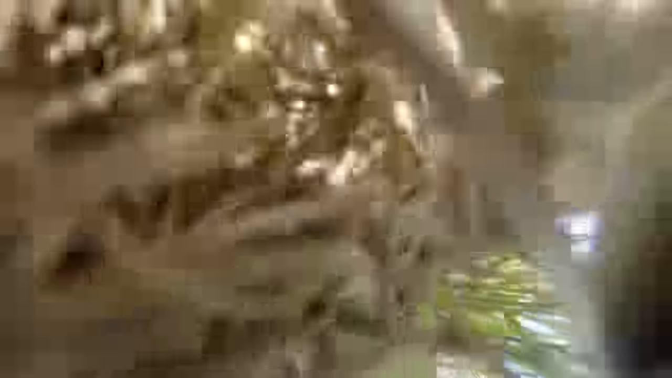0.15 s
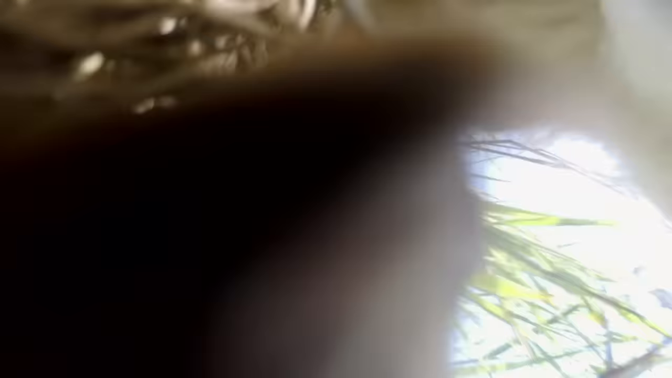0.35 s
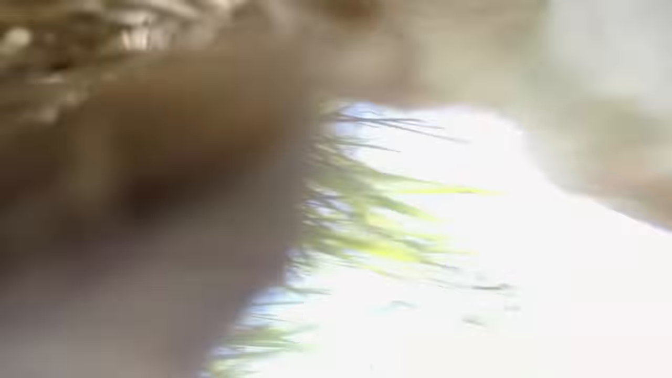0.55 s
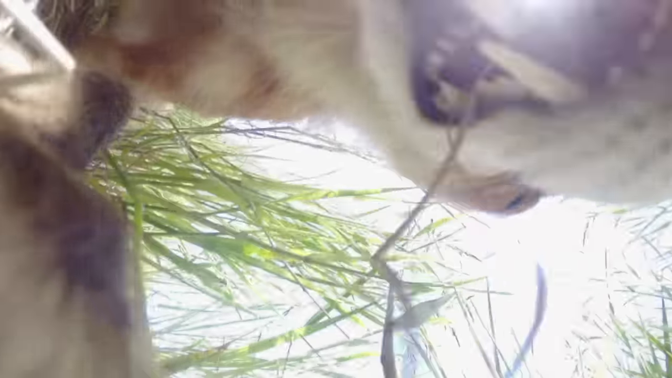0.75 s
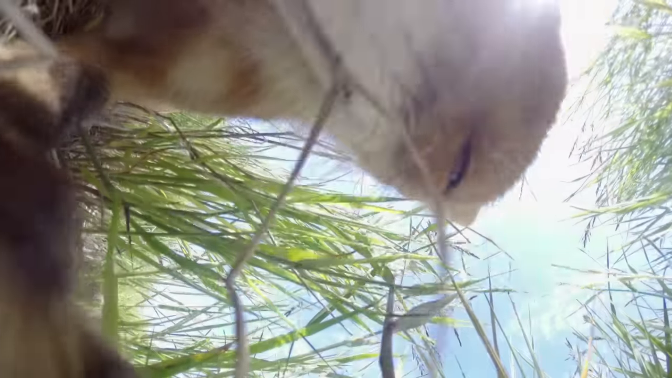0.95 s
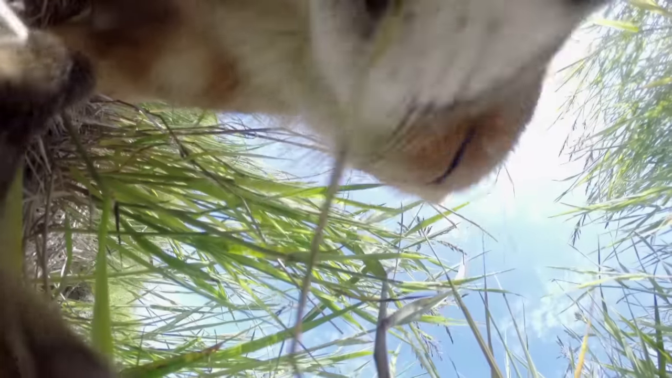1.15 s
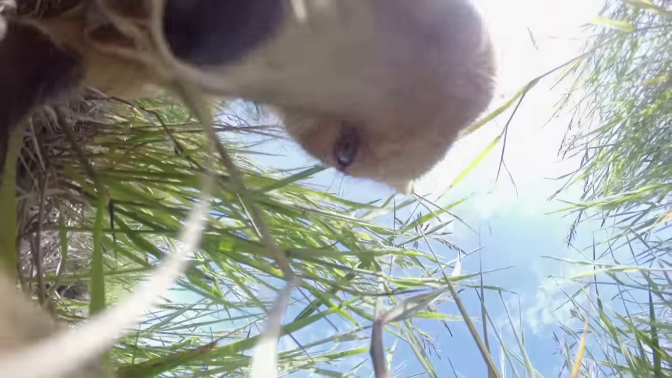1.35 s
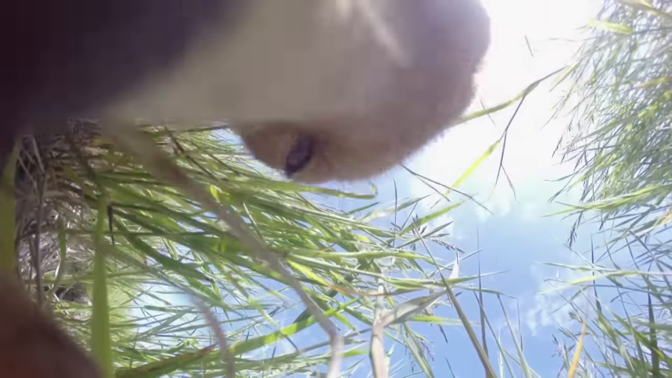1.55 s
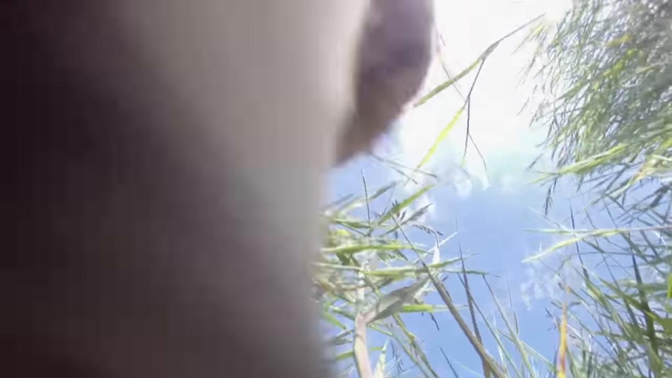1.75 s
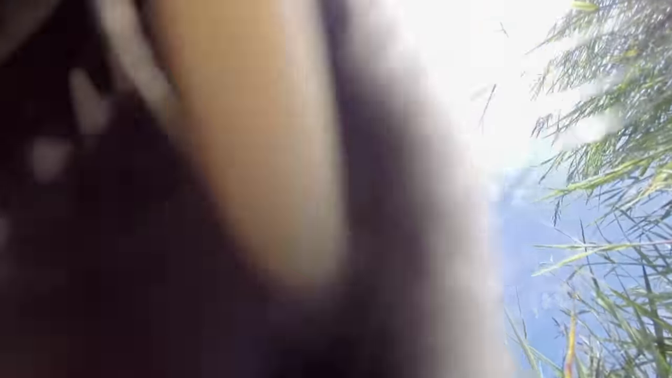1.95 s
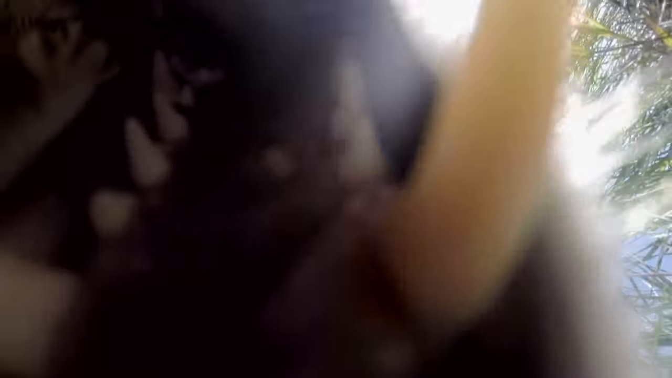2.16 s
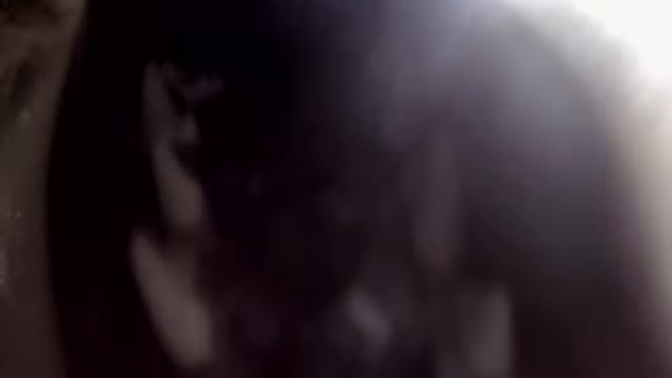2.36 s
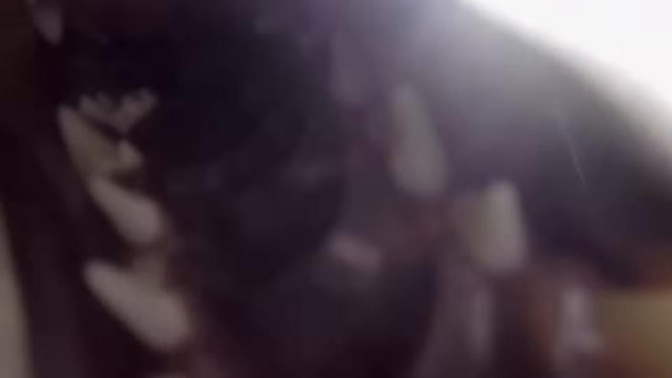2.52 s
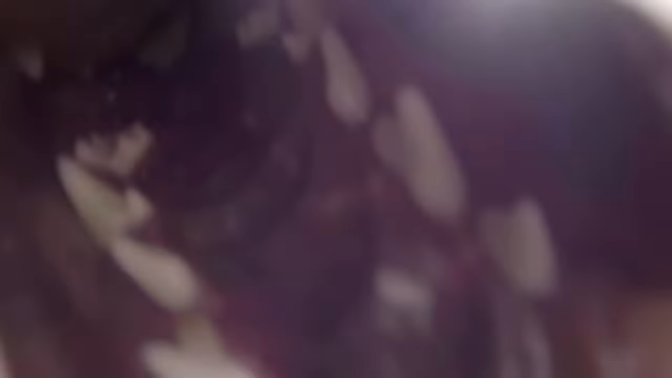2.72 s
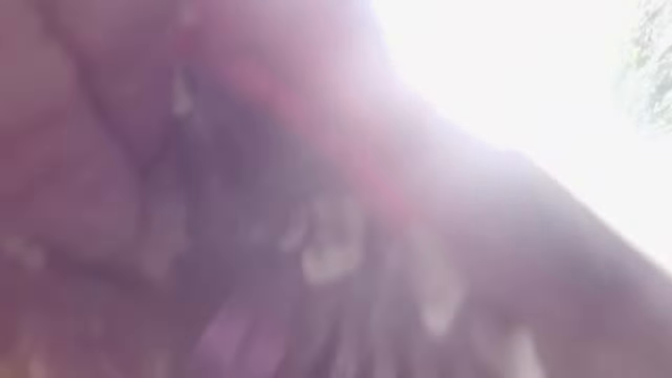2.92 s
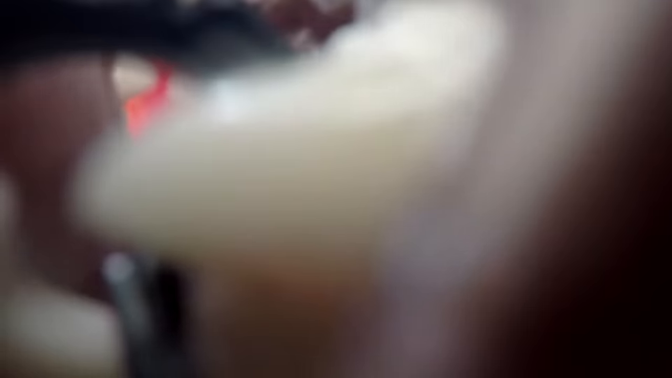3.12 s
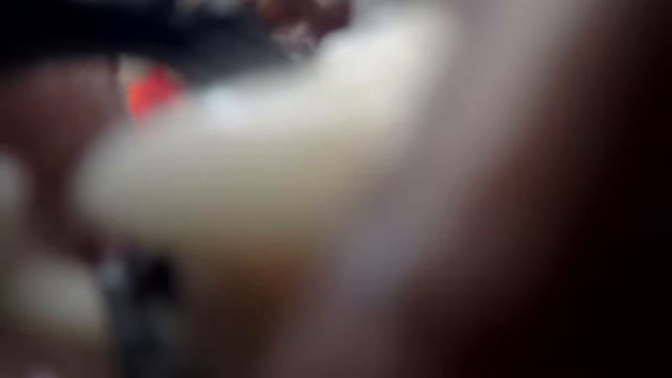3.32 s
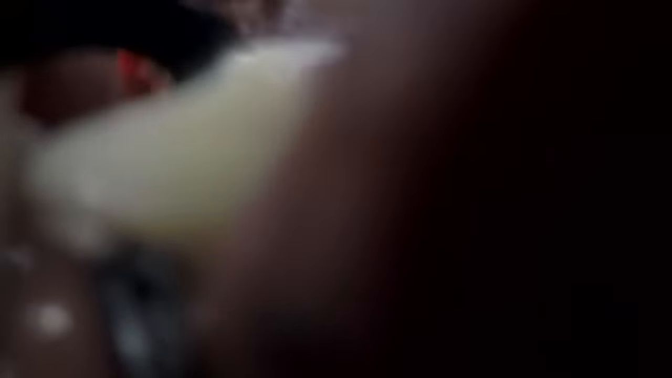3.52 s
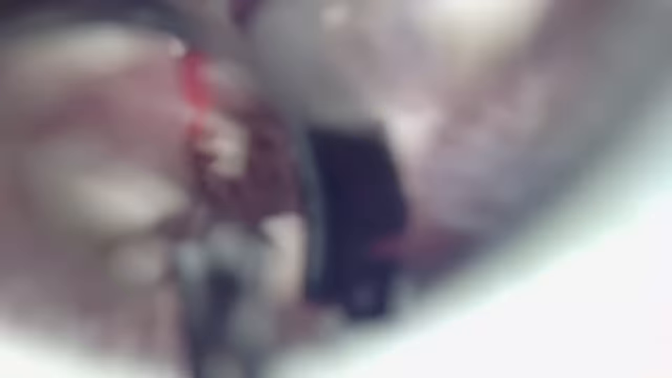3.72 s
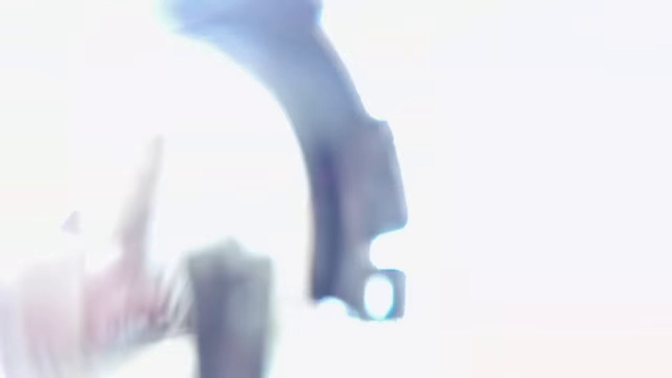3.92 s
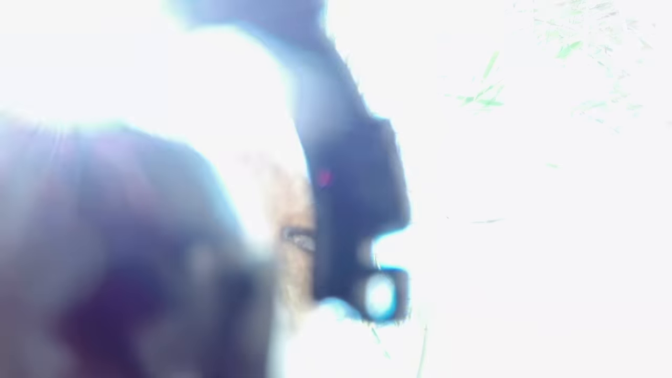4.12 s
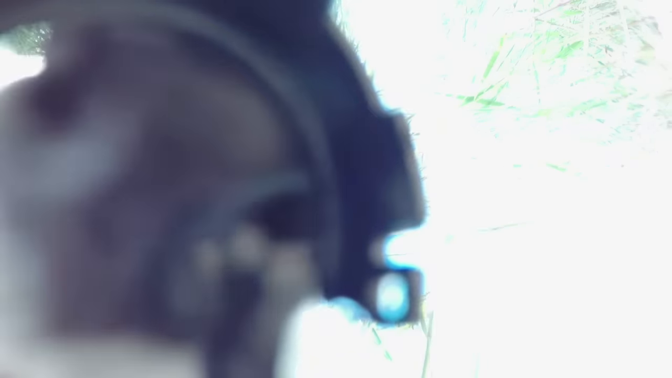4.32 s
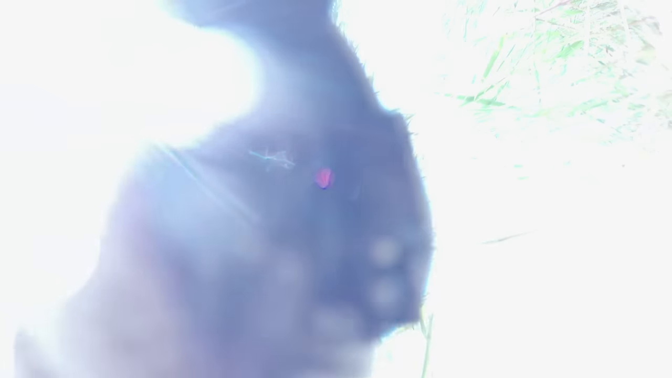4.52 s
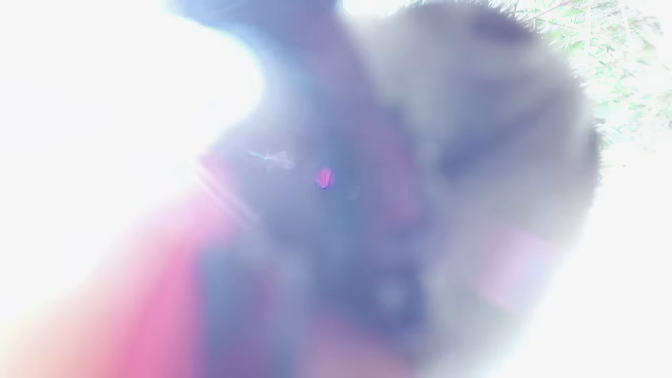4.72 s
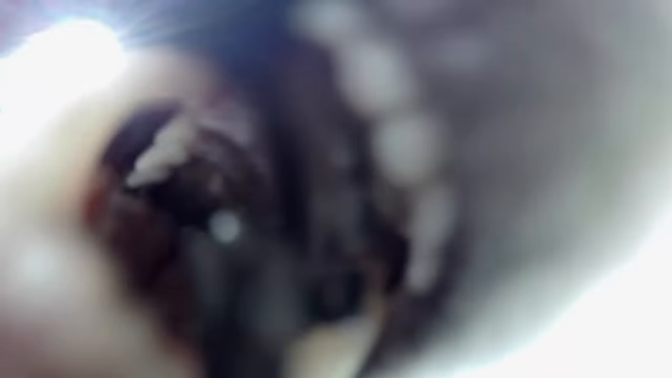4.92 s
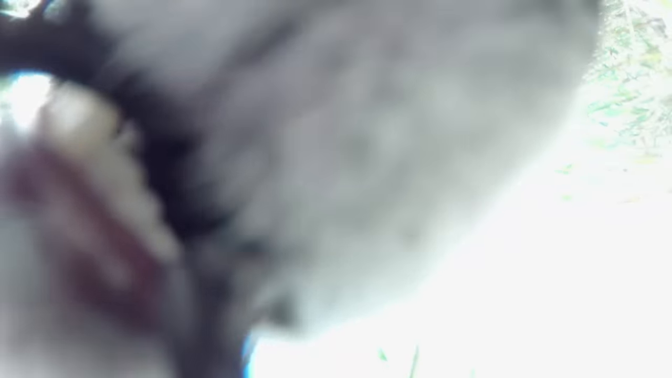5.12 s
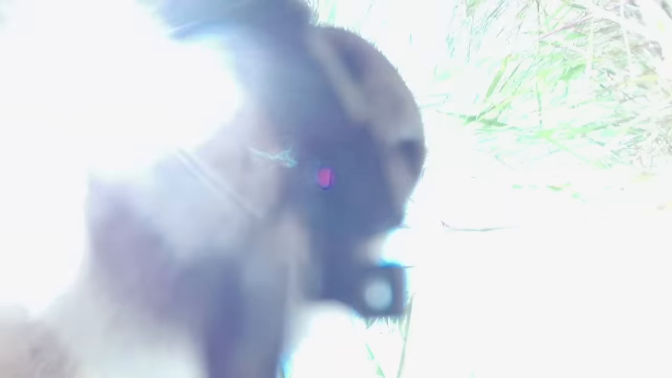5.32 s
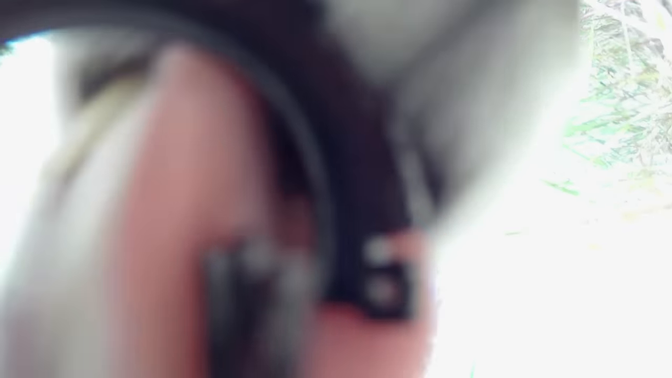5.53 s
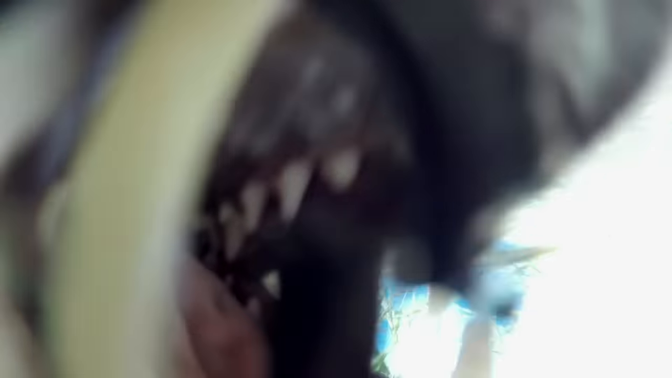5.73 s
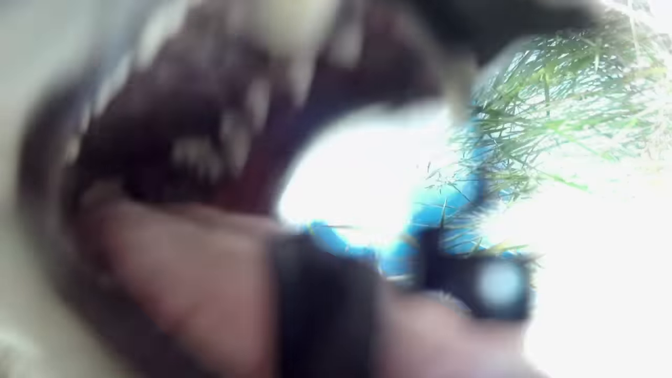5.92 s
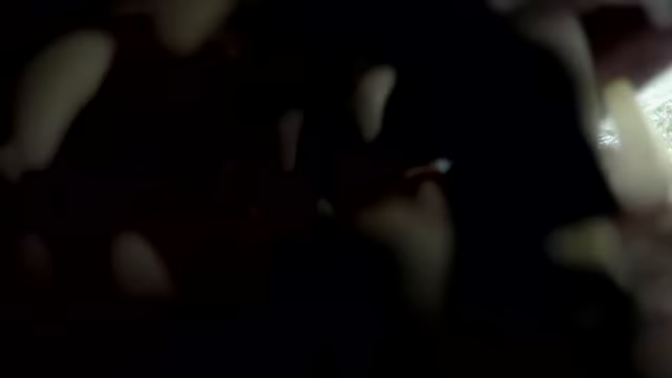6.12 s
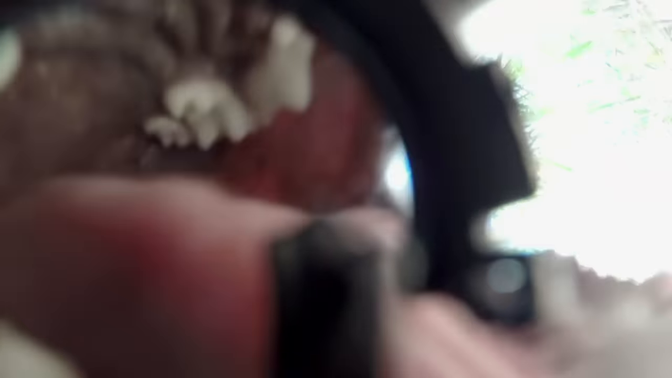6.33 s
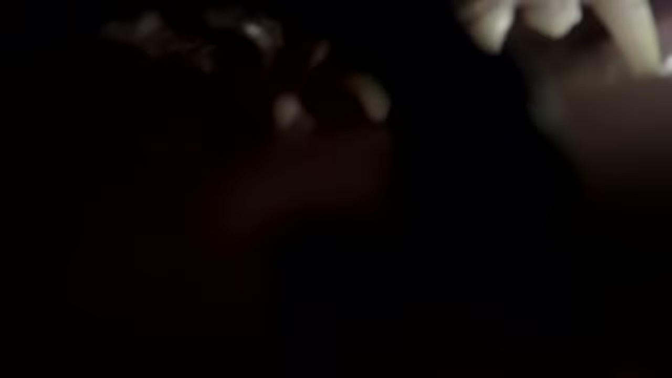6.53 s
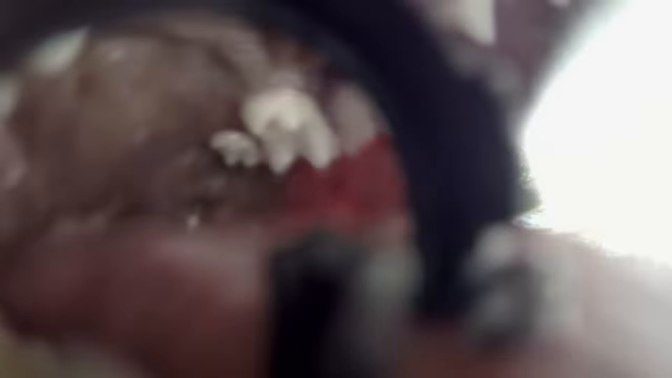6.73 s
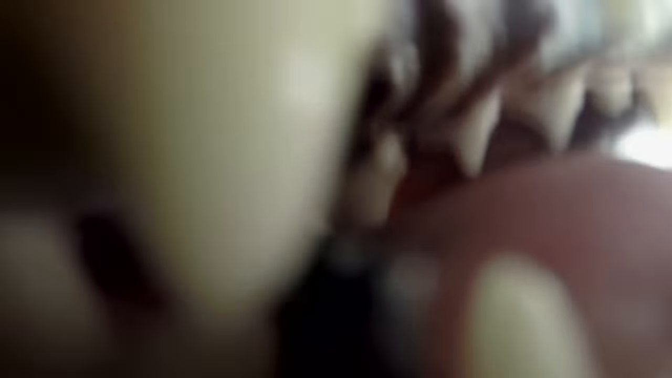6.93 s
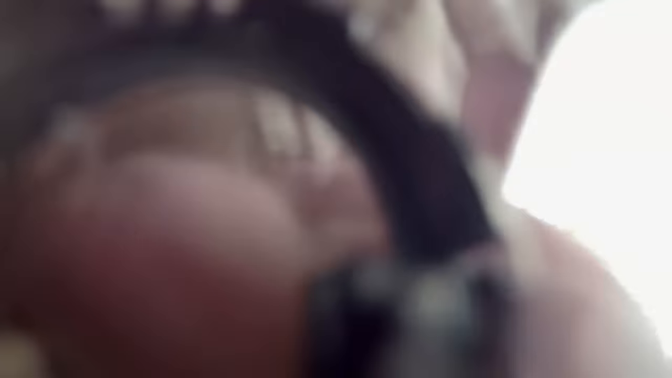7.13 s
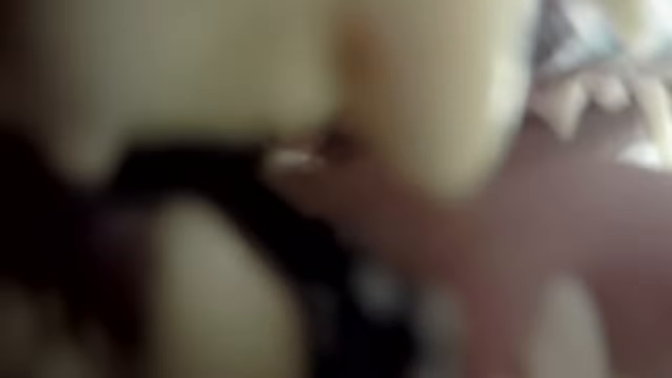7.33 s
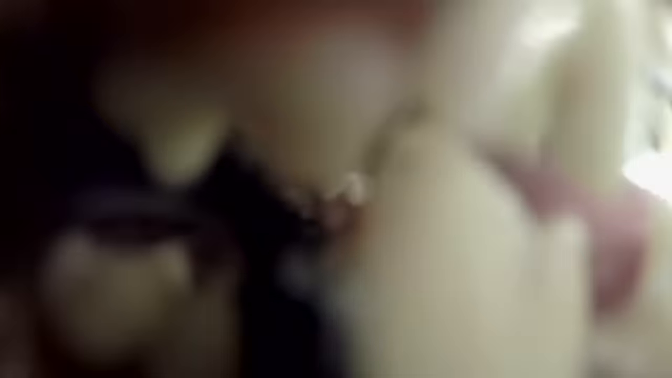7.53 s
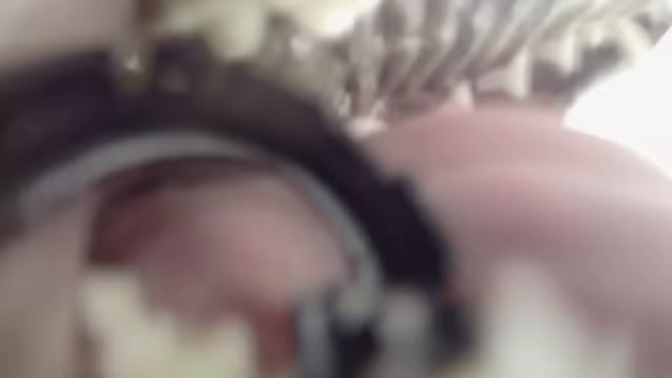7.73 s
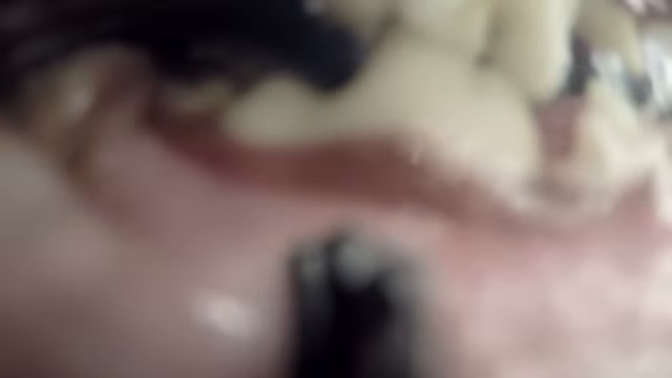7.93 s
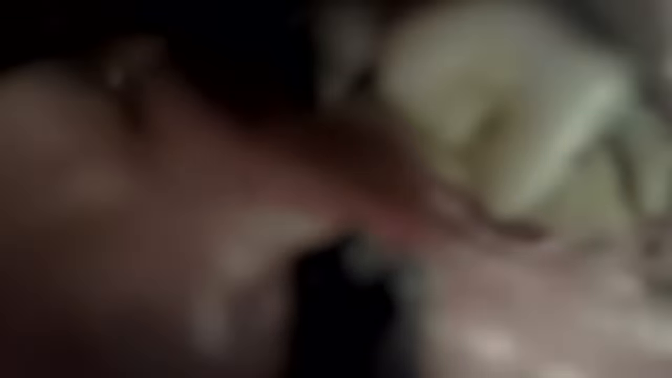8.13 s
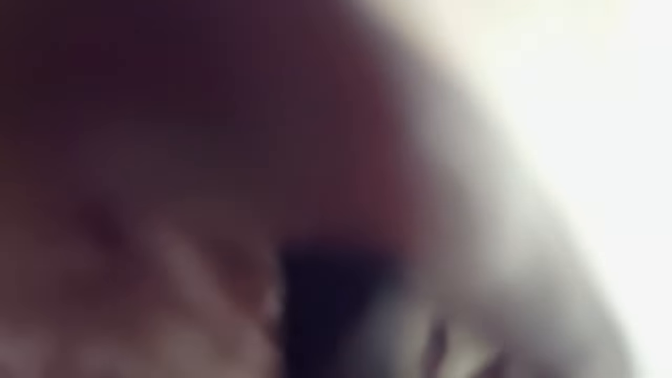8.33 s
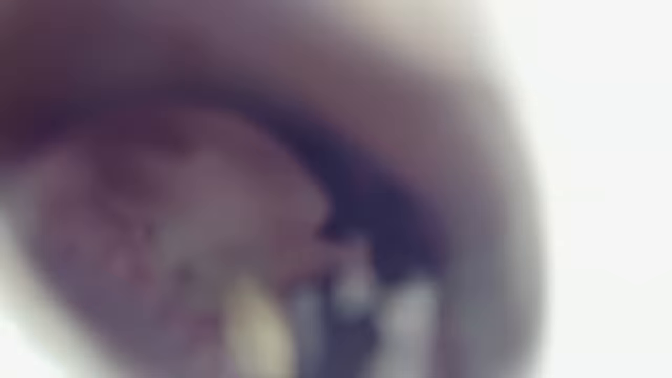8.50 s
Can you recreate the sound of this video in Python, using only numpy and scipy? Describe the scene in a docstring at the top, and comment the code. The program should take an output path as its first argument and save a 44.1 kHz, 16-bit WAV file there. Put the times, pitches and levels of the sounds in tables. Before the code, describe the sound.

Heard from inside a plastic case gripped in jaws: brittle tooth clacks, low pressure thuds, rubbing and wet fizz. Early knocks fade to sparse ticks of grass, two short rasping tooth drags come midway, one loud double knock snaps, then softer handling builds into busy crunching and ends in a few hard clicks. Outdoors, no echo, extremely close.

```python
"""Animal chewing a camera in grass

An animal chews a small plastic camera in dry grass; all sound reaches the microphone through the case.
Teeth and grass are noise bursts ringing the shell; squeezes of the sealed air are damped swings.
Jaws and tongue are filtered noise under stroke levels: rumble, scrape or rush, and fizz; dragged teeth
rasp as random slips into two rings. Breath is resonant hiss; a soft rush of air stays between the bites.
"""
import sys
import numpy as np
from scipy import signal
from scipy.fft import rfft, irfft, next_fast_len
from scipy.io import wavfile
from scipy.ndimage import uniform_filter1d, map_coordinates

SR = 44100
rng = np.random.default_rng(int(sys.argv[2]) if len(sys.argv) > 2 else 0)


def materialize(psi):
    """Save the field psi as 16-bit PCM at rate SR to the path in sys.argv[1].

    A 1-D psi becomes a single channel; in a 2-D psi each row is a channel.
    """
    bounded = np.clip(np.atleast_2d(psi).T, -1, 1)
    quanta = np.round(bounded * 32767).astype(np.int16)
    wavfile.write(sys.argv[1], SR, quanta)


N = 377496

# Tooth contacts. Each row: start in seconds, peak envelope in dB, ring in Hz, length in ms, crack trim in dB.
TOOTH_CONTACTS = [(0.0389, -22, 2580, 3, -4), (0.1362, -13.5, 4960, 2.9, 8), (0.2113, -27.5, 4330, 5.4, -3),
                  (0.3484, -5, 3830, 1, 1), (0.3509, -6.5, 4300, 2.9, 1), (0.368, -24, 1130, 5.2, -31),
                  (0.395, -10.5, 5700, 1.8, 5), (0.4602, -25, 4900, 6.8, -5), (0.4845, -16.5, 4660, 2.3, 9),
                  (0.6388, -19, 2500, 3.5, -2), (0.6775, -24, 5100, 2.1, -13),
                  (1.1427, -28.5, 3280, 2.6, -4), (1.4306, -35, 1710, 3.1, -7), (1.872, -23, 4400, 4.1, 9),
                  (2.104, -11, 4840, 0.84, -8.5), (2.5257, -22.5, 1030.0, 3.5, -1.5),
                  (2.542, -11, 4480, 1.45, -10.5), (2.6083, -21, 1590, 4.3, -17),
                  (2.629, -23, 5360, 1.2, -6), (2.708, -19, 1530, 2.3, -20),
                  (2.773, -11, 3730, 1.26, -14.5), (3.0802, -18, 1720, 0.96, -8),
                  (3.102, -33, 2030, 2.2, -10), (3.4326, -18, 1700, 3.5, -21.5),
                  (3.4982, -25, 1720, 4, -17), (3.685, -25, 1630, 6.4, -8.5),
                  (3.701, -25, 1440, 2.3, -12.5), (3.7708, -25, 980, 5.5, -13.5),
                  (3.791, -7, 1580, 3.2, -11.5), (3.7999, -3, 3110, 3.45, 25.5),
                  (3.8079, -9.5, 5400, 1.75, 0), (3.8144, -25, 1500, 1.3, -1.5),
                  (4.078, -34, 1864, 3.3, -21), (4.5005, -38.5, 1560, 3.7, -14),
                  (4.792, -38, 1490, 2.6, -19), (4.961, -30, 1670, 6.8, -16.5), (4.995, -34, 3400, 19, -11),
                  (5.089, -18.5, 8400, 5.8, 1), (5.113, -33, 4320, 4.2, 7.5), (5.2987, -14, 4330, 6.6, 11),
                  (5.3065, -7, 3970, 4.1, 6), (5.312, -38.5, 1280, 26, -31), (5.733, -31.5, 3360, 2, 10),
                  (5.7605, -25, 3340, 4.1, -5), (5.8056, -30, 3330, 7, -2), (5.849, -25.5, 5100, 2.8, 1),
                  (6, -15.5, 3020, 2.5, -11.5), (6.0405, -16.5, 8300, 1.4, 1), (6.2199, -27, 3500, 2.1, -6),
                  (6.2912, -25, 1720, 1.7, -23), (6.327, -26.5, 1190, 1.05, -14),
                  (6.3547, -28.5, 3280, 3.2, -3), (6.464, -23.5, 4550, 3.9, 4),
                  (6.4783, -23.5, 1660, 7.6, -13.5), (6.5412, -16.5, 2190, 1.7, -38),
                  (6.719, -16.5, 2740, 1.4, -2), (6.8082, -31, 1680, 1.4, 9),
                  (6.8398, -20.5, 1020, 1.7, 12.5), (6.9024, -7, 2300, 2.8, -3),
                  (7.005, -24.5, 2050, 3.3, -13), (7.179, -19, 1200, 2.2, 0), (7.1837, -16, 1000, 1.4, -12),
                  (7.195, -24.5, 1900, 7.2, -11), (7.237, -26, 4260.0, 3.9, 7),
                  (7.269, -22.5, 1860, 1.6, -10), (7.304, -20, 1800, 4, -14), (7.307, -32.5, 2240, 33, -26),
                  (7.3233, -24, 2300, 3.7, -13), (7.392, -33, 1530, 12, -40),
                  (7.463, -28.5, 2290, 6.2, -47), (7.5097, -31, 1720, 1.7, -5),
                  (7.5461, -24.5, 1920, 2.4, -12.5), (7.5832, -23, 1700, 15, -21.5),
                  (7.682, -23.5, 1890, 7, -34), (7.717, -9, 2070, 1.8, -23.5),
                  (7.861, -18.5, 2010, 2.3, -2), (7.867, -19.5, 2540, 2.2, -10),
                  (7.877, -17.5, 1080, 2.2, -25.5), (7.9005, -12.5, 2180, 2.3, -5),
                  (8.188, -6, 2460, 1.5, -18), (8.3658, -8.5, 2220, 1.5, 1), (8.3692, -23, 4020, 2.5, -0.5),
                  (8.3788, -15.5, 4410, 3.8, -7), (8.4035, -17, 4340, 0.33, 7)]
# Grass stems and grit on the shell. Each row: start in seconds, peak envelope in dB, ring in Hz.
GRASS_TICKS = [(.335, -26.5, 2370), (.389, -26, 6300), (.431, -27, 4760), (.439, -25, 2930),
               (.688, -32, 7500), (.826, -32.5, 7050), (.865, -44, 3700), (0.879, -39.5, 3980),
               (.922, -39, 5700), (1.021, -36.5, 4400), (1.036, -37.5, 2160), (1.087, -32, 6530),
               (1.114, -31.5, 7500), (1.157, -33, 4500), (1.172, -32, 6600), (1.215, -26.5, 3330),
               (1.235, -36, 3200), (3.044, -33, 3000), (3.4622, -31, 10050), (3.8603, -41.5, 7150),
               (5.774, -32, 8000), (5.908, -32.5, 7950), (5.94, -40, 4000), (6.104, -44, 8000),
               (6.342, -31, 4960), (6.378, -36, 4500), (6.559, -22.5, 7300), (6.603, -28, 7000),
               (6.732, -30, 3200), (7.8066, -28, 7050)]
TICK_MS, TICK_CRACK_DB = 1.19, -8  # length and crack trim of every tick
# Colour of a crack. Each row: frequency in Hz, relative gain in dB.
CRACK_COLOUR = [(300, -8), (1000, 5.5), (2500, 3), (5000, 1.5), (14800, -14.5), (16400, -38.5)]
# Squeezes of the case. Each row: start in seconds, swing peak in dB, nominal swing rate in Hz.
SQUEEZES = [(0.004, -14, 235), (0.1368, -3.5, 296), (0.3705, -3.5, 640), (0.3952, -2.5, 375),
            (0.4626, -12.5, 245), (0.4667, -2.5, 236), (0.892, -24.5, 90), (0.907, -20.5, 64),
            (0.929, -24, 59), (1.9888, -12.5, 243), (2.0145, -13.5, 337), (2.102, -10.5, 252),
            (2.1523, -10.5, 463), (2.167, -14.5, 233), (2.393, -19, 310), (2.4533, -17.5, 210),
            (2.5266, -5, 395), (2.5434, -20, 480.0), (2.5735, -18, 197), (2.5987, -29, 120),
            (2.6078, -6.5, 424), (2.6101, -17, 400), (2.6204, -23, 275), (2.63, -20, 300),
            (2.6358, -16, 563), (2.7092, -13, 223), (2.853, -28, 300), (2.874, -22.5, 300),
            (2.8898, -22, 320), (2.8985, -19, 314), (3.0782, -19, 393), (3.4347, -11.5, 109),
            (3.621, -17.5, 171), (3.6908, -17, 205), (3.7716, 0, 746), (3.7895, -3, 636), (3.8, -37, 745),
            (3.807, -17, 267), (4.921, -17, 105), (4.9468, -23.5, 605), (5.306, -15, 222),
            (5.808, -19.5, 350.0), (5.869, -16, 104), (6.035, -22, 200), (6.221, -19.5, 108),
            (6.374, -24, 108), (6.465, -15, 111), (6.479, -6.5, 203), (6.53, -11.5, 117),
            (6.539, -13, 83.4), (6.808, 1.5, 366), (6.8388, -6.5, 277), (6.8868, -18, 400.0),
            (6.902, -16.5, 536), (7.0034, -12.5, 145), (7.025, -19.5, 112), (7.1843, -9, 715),
            (7.2305, -1.5, 342), (7.2395, -8, 94), (7.3251, -13.5, 292), (7.5602, -10, 140),
            (7.593, -13.5, 181), (7.678, -19.5, 176), (7.7674, -16, 87.5), (7.8681, -12, 186),
            (7.882, -20, 290), (7.911, -20, 210.0), (7.998, -16.5, 196), (8.1863, -9, 730),
            (8.1873, -1.5, 235)]

# Colour of the pressure lumps. Each row: frequency in Hz, relative gain in dB.
RUMBLE_COLOUR = [(15, -25.5), (30, 4), (110, -2.5), (320, -12), (600, -28), (3000, -76)]
# Resonances of the case wall. Each row: centre in Hz, width in Hz, relative gain in dB.
WALL_MODES = [(674, 180, -6), (1610, 390, -4), (3050, 780, -13)]
# Colour of light rubbing and air. Each row: frequency in Hz, relative gain in dB.
RUSH_COLOUR = [(200, -30.5), (400, 0), (1000, -6.5), (1600, -11), (3500, -21.5), (16400, -47.5)]
# Colour of the wet fizz. Each row: frequency in Hz, relative gain in dB.
FIZZ_COLOUR = [(1200, -19), (2500, -3.5), (4200, -1.5), (8000, -7.5), (14800, -14.5), (16400, -42.5)]
# Case in grass or mouth between strokes; rumble and fizz play 3 dB above these settings.
# Each row: time in seconds, rumble setting in dB, rub level in dB, fizz setting in dB.
RESTING_LEVELS = [(0, -41, -53.5, -55.5), (.5, -55, -58, -59.5), (1.0, -52, -54, -59.5),
                  (1.3, -52, -54, -63.5), (1.95, -51, -53, -63.5), (2.5, -42.5, -51, -56),
                  (3.08, -50, -52, -57), (3.11, -60, -62, -80), (3.36, -51, -53.5, -61),
                  (3.76, -43, -47.5, -58), (3.832, -51, -64.5, -70.5), (3.9, -65.5, -68, -83.5),
                  (4.098, -61.5, -63, -84), (4.35, -54.5, -57, -72.5), (4.9, -47, -51.5, -68),
                  (5.7, -50.5, -53.5, -68), (7.3, -47.5, -52.5, -64.5), (8.17, -43, -48, -57.5),
                  (8.21, -59, -59.5, -65), (8.56, -59.5, -64, -77.5)]
# Strokes of jaw and tongue, same level settings, before the sag.
# Each row: start in seconds, length in seconds, rumble setting in dB, rub level in dB, fizz setting in dB.
JAW_STROKES = [(0.066, 0.057, -60, -46.5, -44.5), (0.135, 0.013, -14, -31, -46.5),
               (0.35, 0.012, -26, -58.5, -45.5), (0.394, 0.01, -31, -35.5, -41.5),
               (0.437, 0.034, -48, -59, -42.5), (0.475, 0.018, -21, -38, -71),
               (0.649, 0.081, -48, -51, -47), (0.73, 0.059, -67, -60, -49), (0.83, 0.092, -47, -73, -55.5),
               (0.972, 0.057, -53, -52, -48.5), (1.223, 0.047, -63, -60, -52),
               (1.81, 0.089, -49, -52, -50.5), (1.994, 0.078, -45, -47.5, -54),
               (2.099, 0.16, -30, -41.5, -51.5), (2.261, 0.19, -38.5, -45, -71),
               (2.607, 0.036, -26.5, -36.5, -41), (2.66, 0.057, -53, -24.5, -49.5),
               (2.765, 0.084, -43, -41, -50), (2.875, 0.038, -57, -49, -45),
               (3.045, 0.06, -36.5, -44.5, -52), (3.408, 0.27, -41.5, -51, -53),
               (3.49, 0.0264, -27.5, -33, -47.5), (3.68, 0.03, -25.5, -42, -61),
               (3.785, 0.035, -27, -36, -50), (4.962, 0.194, -27, -37, -65), (5.156, 0.14, -39, -46, -80),
               (5.296, 0.026, -25, -40, -48), (5.737, 0.67, -45, -52.5, -61.5),
               (5.886, 0.042, -28, -44, -52.5), (5.961, 0.033, -40.5, -48, -51),
               (6.031, 0.0125, -32, -34.5, -35), (6.308, 0.37, -41, -45.5, -57),
               (6.518, 0.058, -26.5, -34.5, -41), (6.576, 0.039, -35, -37, -40),
               (6.606, 0.08, -41.5, -41, -57), (6.683, 0.11, -34, -39.5, -46),
               (6.79, 0.03, -29.5, -36.5, -38), (6.831, 0.084, -32, -40, -49.5),
               (6.956, 0.041, -38.5, -38, -52), (7.003, 0.049, -32, -31.5, -48),
               (7.077, 0.045, -36.5, -39, -56.5), (7.147, 0.075, -30.5, -36.5, -46.5),
               (7.236, 0.11, -32, -41.5, -61.5), (7.455, 0.023, -30.5, -39, -50),
               (7.549, 0.03, -27, -37.5, -47.5), (7.657, 0.025, -26.5, -39.5, -48.5),
               (7.578, 0.166, -39.5, -52, -79.5), (7.757, 0.059, -48, -43.5, -49),
               (7.858, 0.057, -25, -34, -51.5), (7.924, .27, -41.5, -66.5, -79),
               (8.188, 0.0092, -30, -29, -66.5), (8.284, 0.16, -44, -49, -52.5)]
RISE_BASE_S, RISE_SHARE = 0.0063, 0.16  # onset: fixed part, plus a share of the stroke length
FALL_SHARE, SAG_DB = 0.083, 3.5  # release as a share of the length; loss from start to end

# Dragging, stuttering teeth.
# Each row: start in seconds, length in seconds, rms in dB before edge fades, low ring from Hz, to Hz, high ring in Hz.
TOOTH_DRAGS = [(2.653, .056, -29.5, 576, 908, 1565), (2.779, .076, -37, 456, 389.4, 1375)]
SLIPS_PER_S, RING_BASE_S, LOW_RING_DB = 400, 0.0061, -2  # mean rate; decay to be scaled; low against high

# Breath over the case. Each row: start in seconds, length in seconds, flow peak in dB before flutter.
BREATHS = [(2.11, 0.3, -49.5), (6.589, 0.092, -47)]
# Throat resonances, each applied twice. Each row: centre in Hz, width of one pass in Hz, relative gain in dB.
THROAT_MODES = [(2700, 1430, 3), (4870, 900, -7)]

TOP_HZ = 16500


def amp(db):
    """Gain of a level in dB."""
    return 10 ** (np.asarray(db) / 20)


def unit(x):
    """x at rms 1."""
    return x / np.sqrt(np.mean(x ** 2) + 1e-20)


def along(points, hz):
    """Interpolates (Hz, value) points on a log frequency axis."""
    point_hz, value = np.transpose(points)
    return np.interp(np.log(hz + 1), np.log(point_hz + 1), value)


def wobble(knots_per_s):
    """Smooth random curve through normally distributed knots."""
    knots = rng.standard_normal(int(N * knots_per_s / SR) + 4)
    return map_coordinates(knots, [np.arange(N) * knots_per_s / SR])


def filtered(x, response):
    """x times a complex response of frequency in Hz."""
    m = next_fast_len(x.shape[-1] + 8192)
    return irfft(rfft(x, m) * response(np.fft.rfftfreq(m, 1 / SR)), m)[..., :x.shape[-1]]


def coloured_noise(colour):
    """White noise shaped by (Hz, dB) points."""
    return filtered(rng.standard_normal(N), lambda f: amp(along(colour, f)))


def mode(f, hz, width_hz):
    """One resonance, gain 1 at its centre."""
    return 1j * f * width_hz / (hz * hz - f * f + 1j * f * width_hz)


def grit(slips_per_s, spread_db, noise_db, fall_20db_ms):
    """Slips at random moments, a few far larger than the rest, over smooth rubbing noise."""
    sizes = amp(spread_db * np.minimum(rng.exponential(size=N), 3))
    slips = (rng.random(N) < slips_per_s / SR) * sizes
    tail = amp(-20 * np.arange(300) / (SR * fall_20db_ms / 1000))
    bursts = unit(signal.fftconvolve(slips, tail)[:N])
    return unit((bursts + amp(noise_db)) * rng.standard_normal(N))


def patchy(x, depth_db):
    """x with small patches of random gain in time and frequency."""
    z = signal.stft(x, nperseg=128)[2]
    field = uniform_filter1d(rng.standard_normal(z.shape), size=10, axis=0)
    field = uniform_filter1d(field, size=9, axis=1)
    return signal.istft(z * amp(depth_db * unit(field)), nperseg=128)[1][:N]


def clicks():
    """A tooth or stem cracks broadly and rings the spot it hits; long wet contacts ring narrower."""
    out, t = np.zeros(N + SR), np.arange(2048) / SR
    ticks = [(s, db, hz, TICK_MS, TICK_CRACK_DB) for s, db, hz in GRASS_TICKS]
    contacts = list(TOOTH_CONTACTS) + ticks
    noise = rng.standard_normal((len(contacts), len(t)))
    for (s, db, hz, ms, crack_db), n in zip(contacts, noise):
        u = 3.6 * t / (ms / 1000)
        burst = n * u * np.exp(-u)
        width_hz = 0.5 * hz / (1 + (ms / 13) ** 2)

        def ring_and_crack(f):
            return mode(f, hz, width_hz) ** 2 + amp(along(CRACK_COLOUR, f) + crack_db - 3.5)

        sound = filtered(burst, ring_and_crack)
        peak = np.sqrt(np.abs(uniform_filter1d(2 * sound ** 2, size=30)).max())
        out[round(s * SR):][:len(t)] += amp(db) * sound / peak
    return out[:N]


def thuds():
    """A squeeze pushes the sealed air once; it swings back and settles within two cycles."""
    out, t = np.zeros(N + SR), np.arange(4096) / SR
    settle = -0.12 * np.sin(2 * np.pi * 55 * t) * np.exp(-t / 0.0071)  # slow leak of the pressure
    for s, db, hz in SQUEEZES:
        cycles = t * hz
        onset = 1 - np.exp(-cycles / 0.01)
        swing = np.sin(2 * np.pi * cycles ** 0.89) * np.exp(-1.6 * cycles) * onset  # rate falls slightly
        out[round(s * SR):][:len(t)] += amp(db) * (swing / swing.max() + settle)
    return out[:N]


def mouth():
    """Jaws and tongue on the case: lumps of pressure, rubbing that bites into the wall, a wet fizz."""
    rumble_db, rub_db, fizz_db = movements()
    grip = wobble(40)  # the hold trembles

    lumps = coloured_noise(RUMBLE_COLOUR)
    rumble = amp(rumble_db + 3) * unit(lumps * amp(2 * wobble(30)))

    scrape = filtered(grit(300, spread_db=4, noise_db=2, fall_20db_ms=2.5), wall)
    scrape = unit(scrape * amp(2.5 * grip))
    rush = unit(coloured_noise(RUSH_COLOUR) * amp(2.8 * grip))
    # hard teeth scrape, soft flesh rushes
    bite = np.clip((rub_db - rumble_db + 12) / 16, 0, 1) * np.clip((rub_db + 52.5) / 10, 0, 1)
    rub = amp(rub_db) * (np.sqrt(bite) * scrape + np.sqrt(1 - bite) * rush)

    # sparse ticks at rest, mostly a dense swish under a stroke
    swept = np.clip((fizz_db + 62) / 12, 0, 0.7)
    sparse = grit(110, spread_db=5, noise_db=-1, fall_20db_ms=0.99)
    dense = grit(300, spread_db=3.5, noise_db=1, fall_20db_ms=1.1)
    grains = np.sqrt(1 - swept) * sparse + np.sqrt(swept) * dense
    spit = filtered(grains, lambda f: amp(along(FIZZ_COLOUR, f)))
    spit = patchy(spit, depth_db=4.5)  # the colour varies from tick to tick
    fizz = amp(fizz_db + 3) * unit(spit * amp(1.5 * grip + wobble(70)))
    return rumble + rub + fizz


def wall(f):
    """Response of the case wall: modes of alternating sign, dulled above 3400 Hz."""
    modes = sum((-1) ** k * amp(db) * mode(f, hz, w) for k, (hz, w, db) in enumerate(WALL_MODES))
    return modes / (1 + (f / 3400) ** 6)


def movements():
    """Mouth levels in dB: strokes rise (long ones slowly), sag and let go, over the resting power."""
    t = np.arange(N) / SR
    s, *rest_db = np.transpose(RESTING_LEVELS)
    power = np.array([amp(2 * np.interp(t, s, db)) for db in rest_db])
    for start, lasts, *levels_db in JAW_STROKES:
        near = slice(max(int((start - lasts) * SR), 0), int((start + 2 * lasts) * SR))
        u = (t[near] - start) / lasts
        rise = 0.5 + u / (RISE_BASE_S / lasts + RISE_SHARE)
        fall = 0.5 + (1 - u) / FALL_SHARE
        shape = np.clip(np.minimum(rise, fall), 0, 1) ** 2 * amp(-2 * SAG_DB * u)
        power[:, near] += amp(2 * np.array(levels_db))[:, None] * shape
    return 10 * np.log10(power)


def rasps():
    """Quick uneven slips keep two rings of the wall going; the low one glides with the bite."""
    out = np.zeros(N)
    for s, lasts, db, from_hz, to_hz, high_hz in TOOTH_DRAGS:
        n = int(lasts * SR)
        chance, size, turn = rng.random((3, SR // 4))[:, :n]
        slips = (chance < SLIPS_PER_S / SR) * size * np.exp(2j * np.pi * turn)

        def ring(share):
            decay = np.exp(-np.arange(n) / (SR * RING_BASE_S * share))
            return signal.fftconvolve(slips, decay)[:n]

        unit_size = np.abs(ring(0.7)).mean() + 1e-9
        glide = np.exp(2j * np.pi * np.cumsum(np.linspace(from_hz, to_hz, n)) / SR)
        low = (1 + ring(0.94) / unit_size) * glide  # the 1 sustains the low ring
        high = ring(0.35) * np.exp(2j * np.pi * high_hz * np.arange(n) / SR)
        both = unit(amp(LOW_RING_DB) * unit(low.real) + unit(high.real))
        out[round(s * SR):][:n] += amp(db) * signal.windows.tukey(n, 0.1) * both
    return out


def puffs():
    """Air hissing through the open jaws swells and fades."""
    t = np.arange(N) / SR

    def throat(f):
        return sum(amp(db) * mode(f, hz, w) ** 2 for hz, w, db in THROAT_MODES)

    hiss = unit(filtered(rng.standard_normal(N), throat))
    flow = np.zeros(N)
    for s, lasts, db in BREATHS:
        swell = np.sin(np.pi * np.clip((t - s) / lasts, 0, 1)).clip(0)
        flow += amp(db) * np.sqrt(swell)
    return flow * hiss * amp(2.4 * wobble(23.14))


def scene():
    """Everything arrives at the one microphone."""
    return (clicks() + thuds() + mouth() + rasps() + puffs())[None]


def record(dry):
    """The loudest cracks meet a soft ceiling; nothing stays above the band limit."""
    held = dry / (1 + np.abs(dry) ** 8) ** (1 / 8)
    return filtered(held, lambda hz: hz < TOP_HZ)


dry = scene()
out = record(dry)
materialize(out)
```